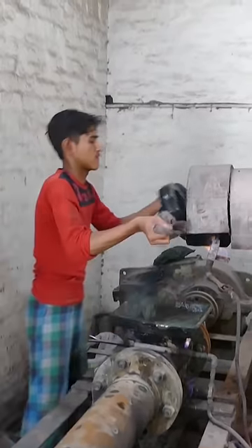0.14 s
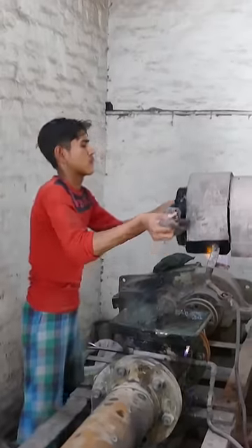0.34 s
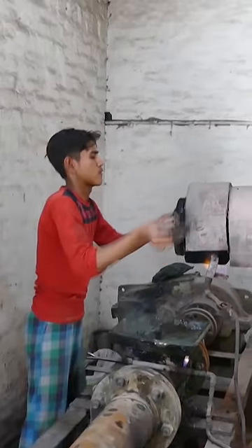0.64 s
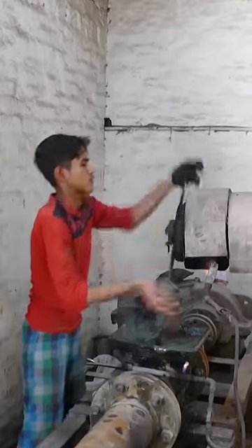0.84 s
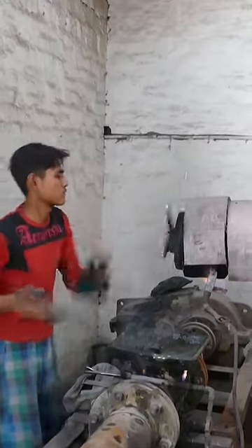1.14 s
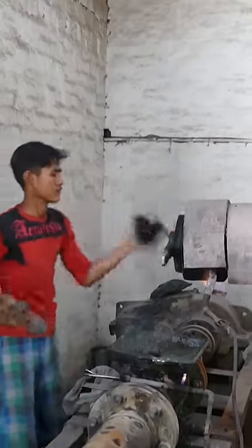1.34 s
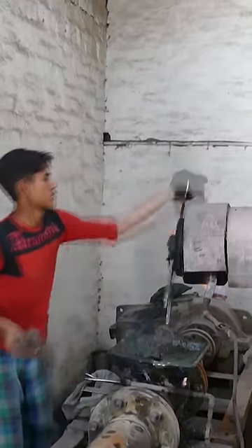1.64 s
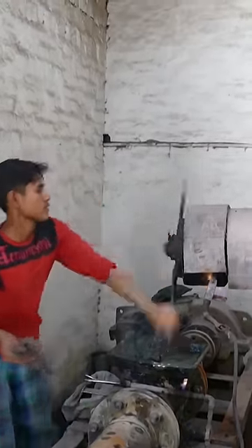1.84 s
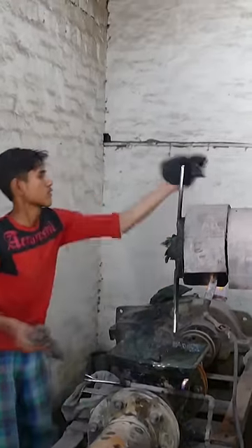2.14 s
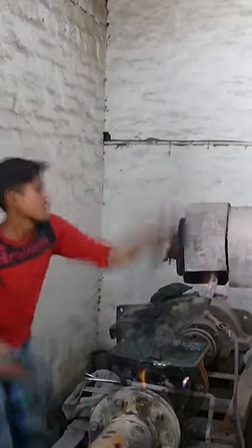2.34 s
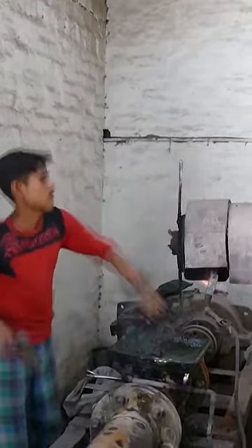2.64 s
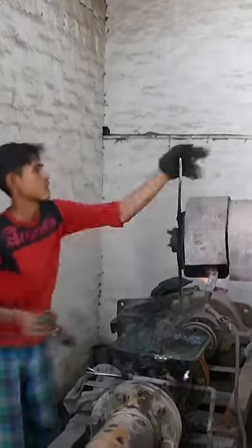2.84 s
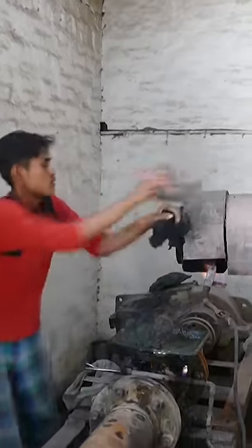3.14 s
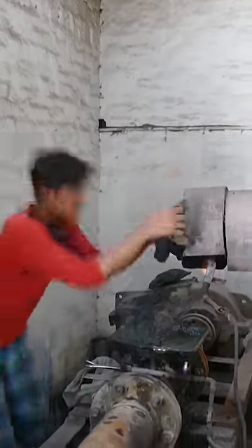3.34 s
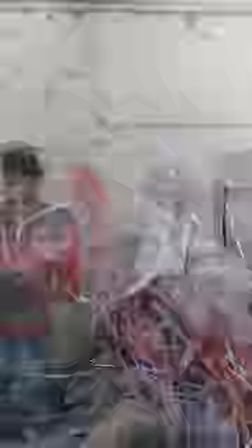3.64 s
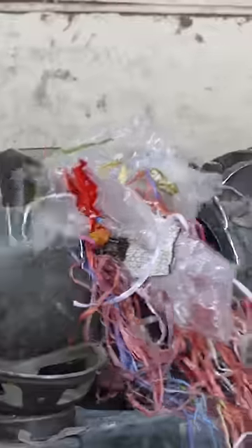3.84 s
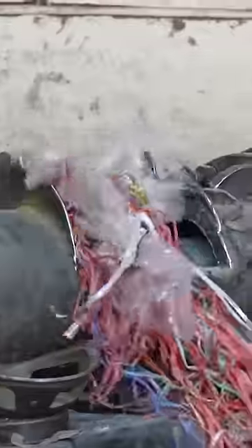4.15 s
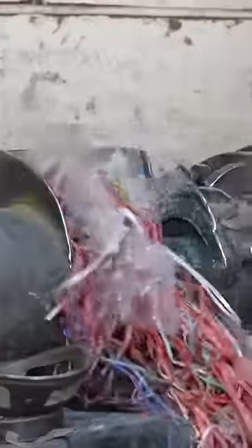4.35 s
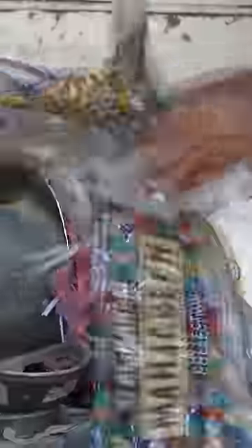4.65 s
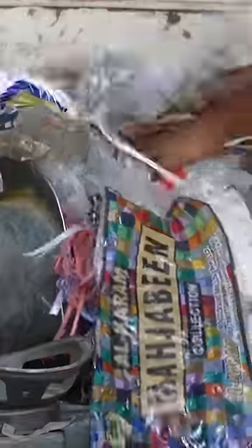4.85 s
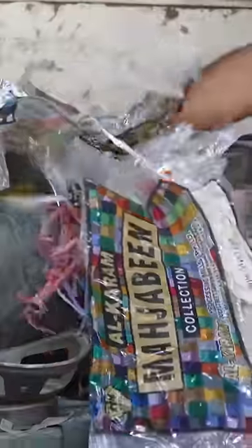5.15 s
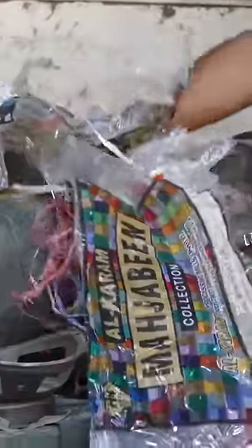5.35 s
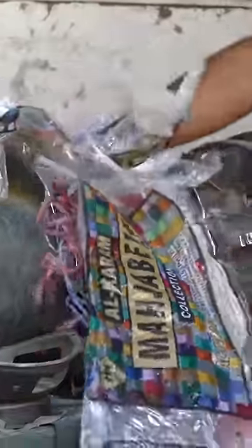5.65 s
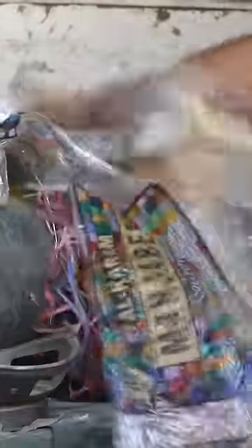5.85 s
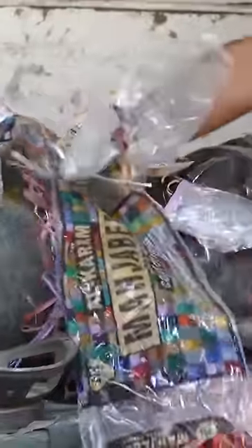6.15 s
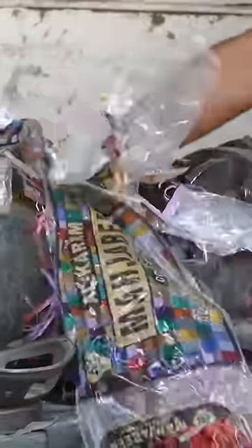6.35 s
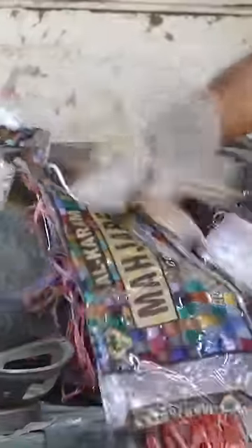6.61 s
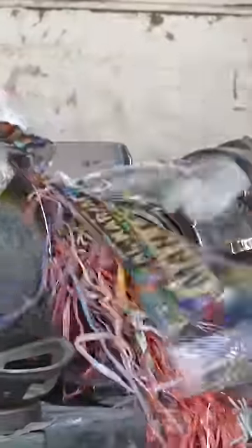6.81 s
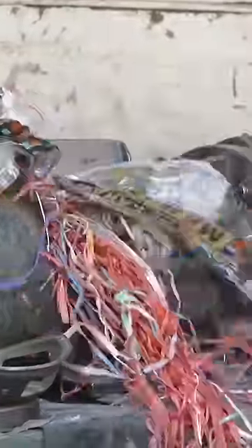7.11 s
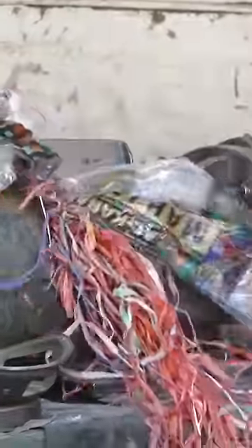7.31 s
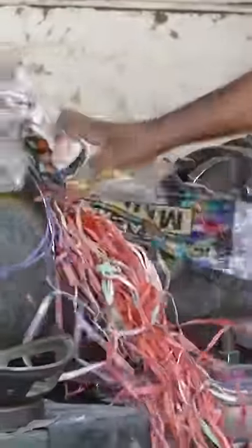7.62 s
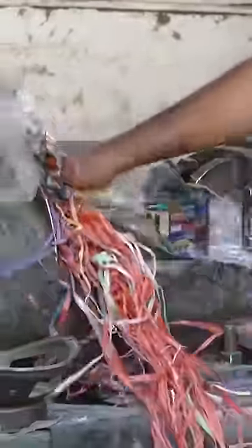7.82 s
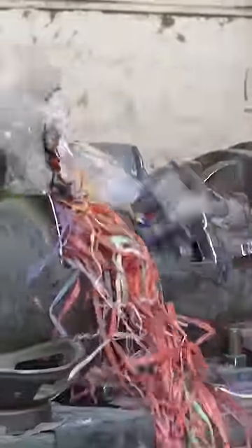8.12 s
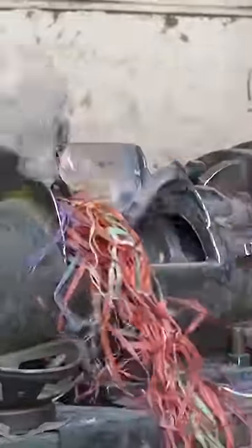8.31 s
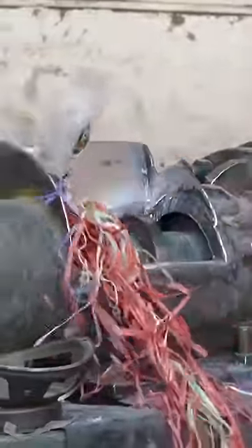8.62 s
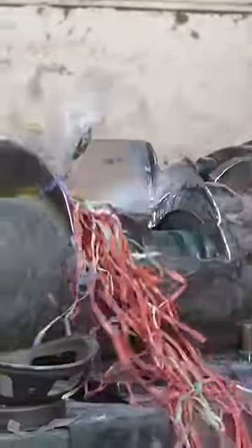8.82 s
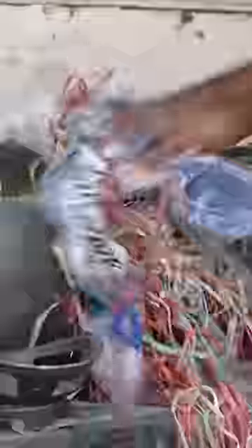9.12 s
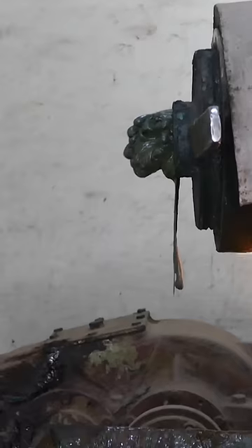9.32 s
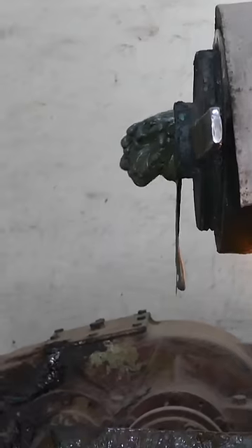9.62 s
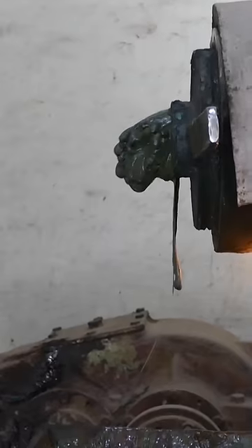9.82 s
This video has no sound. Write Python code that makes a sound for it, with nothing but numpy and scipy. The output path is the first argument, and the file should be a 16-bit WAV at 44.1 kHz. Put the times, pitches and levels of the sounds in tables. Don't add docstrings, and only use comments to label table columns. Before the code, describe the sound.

A loud machine runs without pause: stacked gear tones, wide midrange rush, airy gas hiss and tiny very high belt chirps. Two wet slaps open it, several thin steel clinks follow, then an abrupt jump brings a rougher throbbing gear hum and muffled thumps. A second jump changes the colour again, with faint slaps and panel rattles. Phone close by in a hard-walled room.

```python
import sys
import numpy as np
from scipy import signal
from scipy.fft import rfft, irfft, next_fast_len
from scipy.io import wavfile
from scipy.ndimage import uniform_filter1d, map_coordinates

SR = 44100
rng = np.random.default_rng(int(sys.argv[2]) if len(sys.argv) > 2 else 0)


def inscribe(sig):
    pcm = np.round(np.clip(np.atleast_2d(sig).T, -1, 1) * 32767)
    wavfile.write(sys.argv[1], SR, pcm.astype(np.int16))


def nominal_scale(level):
    x = np.asarray(level, float) / 20
    return 10 ** x


N = 439677


def unit(x):
    return x / np.sqrt(np.mean(x ** 2) + 1e-20)


def along(points, hz):
    f, v = np.transpose(points)
    return np.interp(np.log(hz + 1), np.log(f + 1), v)


def curves(rows, t):
    s, *columns = np.transpose(rows)
    return [np.interp(t, s, column) for column in columns]


def wobble(t, rate):
    slow = t[::32]
    knots = (slow - t[0]) * np.clip(rate, .1, 60)
    return np.interp(t, slow, map_coordinates(rng.standard_normal(400), [knots]))


def filtered(x, response):
    m = next_fast_len(x.shape[-1] + 8192)
    return irfft(rfft(x, m) * response(np.fft.rfftfreq(m, 1 / SR)), m)[..., :x.shape[-1]]


def resonance(hz, centre, width):
    return 1 / (1 + (2 * (hz - centre) / width) ** 2)


def add_at(out, s, sound):
    out[round(s * SR):][:len(sound)] += sound


MESH_HZ = [112.01, 111.872, 111.92]
# (multiple of the base, rms level/dB at place 1, 2, 3)
ORDERS_DB = [(1, -69, -93, -91), (2, -59, -62, -65), (3, -47.5, -51, -61), (5, -47, -50, -43),
             (6, -46, -48, -58), (7, -50, -48, -46), (9, -47, -52, -50), (10, -56, -46, -50),
             (11, -50, -59, -52), (13, -49, -54, -45), (14, -60, -53, -56), (15, -58, -51, -55),
             (19, -60, -55, -57), (26, -53, -60, -60), (27, -56, -54, -57), (28, -51, -56, -57),
             (30, -53, -57, -59), (36, -58, -60, -60), (16, -45, -48, -37), (17, -55, -48, -49),
             (22, -56, -52, -44), (23, -47, -69, -52), (24, -45, -50, -53), (32, -56, -54, -53)]
# (multiple of the base, rms level/dB at place 1, 2, 3)
SIDES_DB = [(4.077, -53, -65, -64), (4.897, -50, -50, -49), (7.135, -51, -53, -58), (12.747, -49, -55, -59),
            (13.08, -44, -60, -58), (20.578, -42, -54, -44), (20.641, -50, -63, -50),
            (21.579, -53, -66, -63), (29.371, -51, -51, -62), (31.369, -50, -56, -67),
            (33.262, -48, -71, -57), (43.14, -76, -57, -57), (30.37, -51, -55, -60), (35.26, -60, -59, -62),
            (40.14, -56, -66, -66), (41.14, -66, -62, -62), (42.14, -66, -59, -61)]
# (t/s, rms level/dB of order 4, of order 8)
SWAY = [(0.004, -31.5, -19.5), (0.19, -31.0, -19.0), (0.38, -32.5, -20.5), (0.56, -30.0, -20.5),
        (0.75, -31.0, -19.5), (0.94, -31.5, -19.0), (1.12, -32.0, -20.0), (1.31, -30.5, -19.5),
        (1.49, -30.5, -19.5), (1.68, -30.5, -20.5), (1.87, -28.0, -21.0), (2.05, -28.0, -21.0),
        (2.24, -28.5, -21.0), (2.43, -29.5, -20.0), (2.61, -30.0, -21.0), (2.8, -30.0, -20.0),
        (2.98, -31.0, -20.5), (3.17, -31.0, -20.5), (3.36, -31.5, -21.0), (3.54, -31.0, -21.5),
        (3.729, -28.5, -20.5), (3.737, -35.0, -25.5), (3.96, -33.0, -26.0), (4.15, -35.0, -26.5),
        (4.34, -34.5, -25.5), (4.53, -32.0, -26.0), (4.72, -32.5, -25.5), (4.91, -32.0, -24.5),
        (5.1, -32.0, -24.5), (5.29, -32.0, -25.5), (5.48, -33.5, -26.0), (5.67, -31.5, -26.0),
        (5.86, -32.0, -26.5), (6.05, -32.5, -25.5), (6.24, -31.5, -26.0), (6.43, -31.0, -26.0),
        (6.62, -29.5, -25.0), (6.81, -31.0, -27.0), (7.0, -30.0, -27.0), (7.19, -31.5, -28.5),
        (7.38, -30.0, -25.5), (7.57, -31.5, -26.5), (7.76, -33.0, -27.0), (7.96, -31.0, -25.0),
        (8.15, -30.5, -28.0), (8.34, -30.0, -25.0), (8.53, -30.5, -28.5), (8.72, -29.5, -27.0),
        (8.91, -30.0, -27.5), (9.1, -30.5, -27.5), (9.288, -29.5, -26.5), (9.296, -36.0, -30.0),
        (9.46, -36.0, -29.5), (9.63, -36.0, -30.0), (9.8, -35.0, -30.5), (9.966, -36.0, -32.0)]
# (t/s, rms level/dB of order 12, of order 20, of side line 34.262)
UPPER_SWAY = [(0.004, -29.5, -46.0, -41.0), (0.24, -32.0, -44.5, -41.5), (0.47, -31.5, -47.5, -40.5),
              (0.7, -30.5, -42.5, -41.0), (0.94, -30.5, -47.5, -40.5), (1.17, -29.0, -42.0, -42.5),
              (1.4, -30.0, -39.0, -41.5), (1.63, -29.5, -41.5, -45.5), (1.87, -31.0, -41.0, -39.0),
              (2.1, -31.0, -41.5, -46.0), (2.33, -31.0, -43.5, -39.5), (2.56, -31.5, -52.0, -45.5),
              (2.8, -32.0, -43.0, -40.0), (3.03, -32.5, -43.0, -42.0), (3.26, -31.0, -50.5, -42.0),
              (3.5, -32.0, -48.0, -42.0), (3.729, -31.0, -42.5, -42.5), (3.737, -25.5, -37.5, -42.0),
              (4.01, -27.0, -44.5, -41.5), (4.25, -29.0, -39.5, -42.0), (4.49, -31.5, -44.0, -41.5),
              (4.73, -31.0, -43.0, -40.0), (4.97, -30.5, -37.5, -48.5), (5.21, -29.5, -37.0, -42.5),
              (5.45, -30.5, -39.5, -43.0), (5.69, -30.5, -46.5, -42.5), (5.93, -32.5, -39.0, -43.5),
              (6.17, -29.5, -37.5, -44.0), (6.41, -29.5, -40.5, -47.0), (6.65, -31.0, -44.0, -43.0),
              (6.89, -29.0, -41.0, -47.0), (7.13, -28.5, -39.0, -47.0), (7.37, -30.0, -38.5, -46.0),
              (7.61, -31.5, -36.5, -46.0), (7.85, -30.5, -42.0, -46.5), (8.09, -32.0, -47.0, -46.5),
              (8.33, -30.0, -46.5, -46.0), (8.57, -31.5, -47.0, -42.5), (8.81, -29.0, -39.0, -47.5),
              (9.05, -29.0, -43.0, -47.0), (9.288, -28.5, -39.5, -42.0), (9.296, -24.5, -36.5, -50.5),
              (9.52, -26.0, -37.0, -50.0), (9.74, -27.5, -36.0, -52.0), (9.966, -28.0, -42.5, -51.5)]
FLUTTER_DB = {4: .3, 8: 0.67, 12: 1, 20: 2, 34.262: 1.8}
# (t/s, f/Hz)
SLIP = [(0, 5.7), (.6, 5.6), (.85, 4.8), (1.3, 5.15), (2, 5.3), (2.5, 5.8), (3.73, 5.55)]
TWIN_DB = [-36, -52, -59]


def whine(t, place):
    in_step_s = .052
    shaft_unrest = .01 * wobble(t, 3) + .0015 * wobble(t, 30)
    turns = MESH_HZ[place] * (t - in_step_s) + shaft_unrest
    start, slow = rng.random(60), t[::32]
    ahead = np.cumsum(curves(SLIP, t)[0]) / SR - SLIP[0][1] * in_step_s

    swaying_db = curves(SWAY, slow) + curves(UPPER_SWAY, slow)
    lines = []
    for (k, flutter_db), db in zip(FLUTTER_DB.items(), swaying_db):
        lines.append((k, 0, db + flutter_db * wobble(slow, 12), 0))
    for k, *db in ORDERS_DB + SIDES_DB:
        lines.append((k, 0, db[place] + .5, min(.4 + .09 * k, 2.2)))
    lines.append((12, ahead, TWIN_DB[place], .6))

    out = np.zeros(len(t))
    for k, lead, db, flicker_db in lines:
        level = np.interp(t, slow, nominal_scale(db + flicker_db * wobble(slow, 5.15)))
        out += level * np.sqrt(2) * np.sin(2 * np.pi * (k * turns + lead + start[round(k)]))
    return out


# (turns/s, peak t/s, level/dB)
WHEEL = (2.288, 3.98, .55)
WHEEL_S = [0, 6.3, 9.58]
PINION_S = [0, 6.66, 9.415]
# (centre f/Hz, Hz per Hz of mesh drift, pulse level/dB once a pinion turn,
# twice a turn, blur f/Hz)
WORN = [
    (480.4, 1, 1, .6, 1.6),
    (963, 1.9, 2, 3.5, 1.2),
    (1445, 2, 3, 2, 9),
    (1913, 2, 10, 1.5, 30),
]
WORN_DB = [
    [0.1, -30.5, -35.5, -37.5],
    [0.1, -29.5, -44, -42],
]
# (t/s, mesh f/Hz, first line level/dB, share that swells with the wheel, runout share)
WORN_MESH = [(3.74, 476, -28, 0.34, 0.92), (4.0, 476, -31.5, 0.4, 1), (4.9, 475.7, -32, 0.44, 0.71),
             (5.35, 478.4, -31, .6, 1.5), (6.3, 476.5, -30.5, 0.65, 1), (7, 482, -31.5, 0.71, 0.89),
             (8.0, 480, -30.5, 0.7, 0.29), (9.28, 481, -32.5, 0.77, 0.55), (9.3, 480.6, -31.5, 0.75, .8),
             (9.97, 479, -37, 0.47, 1)]
# (t/s, second line level/dB, top line level/dB)
TURNS = [(3.79, 0.3, 0.8), (3.96, -1.1, 2.9), (4.13, -3.6, 1.8), (4.3, 1.8, 0.6), (4.47, 2.2, 3.3),
         (4.64, -0.0, 1.9), (4.81, 2.7, 4.4), (4.97, -2.2, -0.5), (5.14, -1.4, 1.2), (5.31, 1.6, 2.0),
         (5.48, -2.4, 0.3), (5.65, 1.7, -4.6), (5.82, -1.2, -0.1), (5.99, -1.3, 0.8), (6.15, 3.3, 3.5),
         (6.32, -0.9, 0.1), (6.49, -0.2, -1.7), (6.66, 1.0, -3.0), (6.83, -1.9, -1.3), (7.0, 1.6, -1.4),
         (7.17, -1.0, -3.8), (7.33, -0.2, -3.3), (7.5, 3.0, -0.9), (7.67, -0.8, 2.2), (7.84, 1.2, 2.0),
         (8.01, -0.2, 2.3), (8.18, 0.6, -0.5), (8.35, 1.7, -5.8), (8.51, -1.9, -3.4), (8.68, 0.7, 0.8),
         (8.85, -2.4, 2.0), (9.02, 0.1, -0.1), (9.19, -0.8, -2.1), (9.45, 4, 2.8), (9.6, -3.1, -1.8),
         (9.79, 2, 1.0), (9.95, 2, -2.0)]
PULSE_LAG = [0, 1.6, 0, 0]


def worn_gears(t, place):
    mesh_hz, first_db, share, runout = curves(WORN_MESH, t)
    second_db, top_db = curves(TURNS, t)
    wheel_angle = 2 * np.pi * WHEEL[0] * (t - WHEEL_S[place])
    pinion = 2 * np.pi * 5.93 * (t - PINION_S[place])

    first = nominal_scale(first_db) * (1 + share * np.cos(wheel_angle))
    second = (1 + .8 * share * np.cos(wheel_angle - .45)) * nominal_scale(.98 * second_db)
    swells = [first, second, 1, nominal_scale(1.4 * top_db)]

    drift = mesh_hz - WORN[0][0] + 1.2 * np.cos(wheel_angle - .5)
    bad_tooth = pinion - 1.35
    kick = runout * (np.cos(bad_tooth) + .6 * np.cos(2 * bad_tooth))
    kicks_hz = [2.2, 6, 9, 5]

    out = np.zeros(len(t))
    for row, level_db, swell, kick_hz, lag in zip(WORN, WORN_DB[place - 1], swells, kicks_hz, PULSE_LAG):
        hz, follow, once_db, twice_db, blur_hz = row
        pulse = nominal_scale(once_db * np.cos(pinion - lag) + twice_db * np.cos(2 * pinion + 2.3))
        line_hz = hz + follow * drift + kick_hz * kick + blur_hz * wobble(t, hz / 40 + 10)
        phase = 2 * np.pi * np.cumsum(line_hz) / SR
        unrest = nominal_scale((.3 + hz / 4000) * wobble(t, 7) + 3 * (hz / 1910) ** 3 * wobble(t, 45))
        out += nominal_scale(level_db) * swell * unit(pulse * unrest * np.sin(phase))
    return out


# (f/Hz, side under mid level/dB)
WIDTH = [
    [(60, -10), (100, -1), (180, -3), (310, -15), (550, -25), (1100, -24), (1650, -12.5), (2860, -18.5), (4970, -6), (6600, -11), (8640, -15), (15000, -8)],
    [(60, -8), (100, -5), (180, -3), (310, -12), (550, -43), (1100, -30), (1650, -17), (2860, -18), (4970, -11), (8640, -15.5), (15000, -18)],
    [(60, -10), (100, -14), (180, -6), (310, -14), (550, -33), (950, -27), (1650, -13), (2860, -19), (4970, -12), (8640, -13), (15000, -22)],
]


def rush(t, gain, place, patchy_db):
    z = signal.stft(rng.standard_normal((2, len(t) + 512)), nperseg=512)[2]
    field = uniform_filter1d(rng.standard_normal(z.shape[1:]), size=8, axis=0)
    field = uniform_filter1d(field, size=10, axis=1)
    pair = signal.istft(z * nominal_scale(patchy_db * unit(field)), nperseg=512)[1][:, :len(t)]
    mid, side = filtered(pair, lambda hz: gain(hz) * nominal_scale([0 * hz, along(WIDTH[place], hz)]))
    return np.array([mid + side, mid - side]) / np.std(mid)


# (f/Hz, level/dB per Hz)
ROAR = [
    [(40, -36), (150, -33), (300, -9.5), (400, -10.5), (550, -4), (900, -4), (1400, -1.5), (1800, -3),
     (2500, -2.5), (3500, -1), (4500, -6.5), (5700, -24), (8000, -25)],
    [(40, -44), (150, -46), (250, -17), (400, -4.5), (550, 3.5), (800, 2.5), (1000, 1), (1200, 6.5),
     (2000, -0.5), (3200, -1.5), (4200, -9.5), (5500, -15), (8000, -25)],
    [(40, -38), (150, -39), (250, -22), (400, -4.5), (550, 1), (800, 0.5), (1000, 11.5), (1200, -0.5),
     (2000, 0.5), (3200, -1), (4200, -8.5), (5500, -12), (8000, -27)],
]
# (f/Hz, width f/Hz, lift level/dB)
CASING = [
    [(545, 24, -1), (840, 23, 2.5), (1460, 57, 1), (1590, 82, -4.5), (2120, 430, -4.5), (2250, 32, 5.5),
     (3750, 47, 5.5)],
    [(380, 7.2, 0), (584, 19, 9), (672, 12, 8.5), (773, 23, 7.5), (865, 28, 8.5), (980, 60, 9.5),
     (1214, 125, -7), (1850, 95, -0.5), (1897, 50, 6), (2030, 180, -2.5), (3270, 18, 7.5), (2560, 67, -1)],
    [(376, 12, 11), (584, 31, 8), (650, 22, 7), (773, 20, 6), (910, 24, 4), (1020, 27, 0), (1470, 40, 7),
     (1950, 27, 3), (2050, 150, -2.5), (3300, 60, 3)],
]


def drive_roar(t, place):
    def gain(hz):
        lift_db = sum(db * resonance(hz, centre, width) for centre, width, db in CASING[place])
        return nominal_scale(along(ROAR[place], hz) + lift_db)
    return nominal_scale([-26.5, -23, -22.5][place]) * rush(t, gain, place, patchy_db=.9)


# (f/Hz, level/dB per Hz)
HISS = [
    [(3000, -22), (5800, -11), (7300, -4), (8300, 2.5), (9100, 2), (10000, 5), (11200, -1), (12200, -6.5),
     (15800, -9.5)],
    [(3000, -24), (5400, -7), (7000, -1.5), (9000, -5), (11000, -11), (13000, -15.5), (15800, -18.5)],
    [(3000, -27), (5400, -3), (7000, 1), (9000, -0.5), (11000, -4), (13000, -9), (15800, -14)],
]


def burner_hiss(t, place):
    noise = rush(t, lambda hz: nominal_scale(along(HISS[place], hz)), place, patchy_db=.34)
    return nominal_scale([-37, -35.5, -35.5][place]) * noise


CUTS = [0, 3.733, 9.292]
# (t/s, level/dB)
LEVELS = [(0.0, 0.3), (0.38, -0.5), (0.8, 0.6), (1.13, -0.1), (1.76, 0.8), (2.87, 0.5), (3.11, -0.5),
          (3.72, 0.4), (3.75, 0.7), (4.41, -0.1), (5.52, -1), (5.84, -0.86), (9.13, -1.1), (9.3, -1),
          (9.434, 0.5), (9.696, -1.5), (9.97, 0)]
# (f/Hz, left over right level/dB)
LEAN = [(900, 0), (1500, .2), (2400, 1.1), (4400, 1.6), (8000, .6), (15000, .5)]
TILT_DB = [.4, 0, 0]


def machine(place):
    first = round(CUTS[place] * SR)
    last = ([round(s * SR) for s in CUTS[1:]] + [N])[place] + 128
    t = np.arange(first, last) / SR
    halves = np.array([[.5], [-.5]])
    effort_db, = curves(LEVELS, t)
    noise = drive_roar(t, place) + burner_hiss(t, place)

    throb_db = .33 * wobble(t, 14) + .4 * wobble(t, 35)
    if place == 1:
        turns, peak_s, wheel_db = WHEEL
        throb_db = throb_db + wheel_db * np.cos(2 * np.pi * turns * (t - peak_s))

    tones = whine(t, place)
    if place:
        tones = tones + worn_gears(t, place)
    tones = tones * nominal_scale((TILT_DB[place] + .2 * wobble(t, 1.9)) * halves)
    both = tones + nominal_scale(effort_db + throb_db) * noise

    lag_s = 5e-6
    return filtered(both, lambda hz: nominal_scale(along(LEAN, hz) * halves) * np.exp(-2j * np.pi * hz * lag_s * halves))


# (joint number, peak level/dB)
CHIRPS = [(0, -38), (1, -39), (3, -38), (4, -38), (6, -41), (7, -39), (10, -35), (11, -36), (14, -39),
          (17, -41), (19, -46), (20, -36), (23, -39), (24, -42), (26, -36), (27, -38), (29, -35), (30, -38),
          (32, -38), (33, -35), (35, -36), (36, -35)]


def belt():
    out, t = np.zeros(N), np.arange(SR // 10) / SR
    for joint, db in CHIRPS:
        s = .0215 + joint * .1003
        hz = 15650 + 300 * np.exp(-t / .015) + 30 * wobble(t, 60)
        swell = (t / .016) ** 2 * np.exp(2 - 2 * t / .015) * nominal_scale(3 * wobble(t, 59))
        add_at(out, s - .014, nominal_scale(db) * swell * np.sin(2 * np.pi * np.cumsum(hz) / SR))
    return out * nominal_scale([[1.2], [-1.2]])


# (t/s, level/dB)
CLINKS = [
    (2.21, -41),
    (2.602, -24),
    (2.846, -35),
    (3.001, -23),
    (3.363, -26),
    (3.62, -35),
]
# (f/Hz, level/dB, swells until t/s, then dies in t/s)
BLADE = [(7950, 0, .002, .003), (8670, 2, .009, .005), (9400, -7, .012, .005), (10200, -7, .024, .005),
         (13100, -5, .016, .006), (14000, -10, .005, .004), (14800, -3, .005, .008)]


def blade():
    out, t = np.zeros(N), np.arange(SR // 5) / SR
    for s, db in CLINKS:
        for late_s, less_db in [(0, -8.5), (.011, -23), (.028, -17)]:
            ring = np.zeros(len(t))
            for hz, level_db, top_s, dies_s in BLADE:
                size = nominal_scale(level_db + rng.normal(0, 1.7))
                swell = (t / top_s * np.exp(1 - t / top_s)) ** (top_s / dies_s)
                ring += size * swell * np.sin(2 * np.pi * hz * (1 + rng.normal(0, .0038)) * t)
            add_at(out, s + late_s, nominal_scale(db + less_db) * ring)
        walls = filtered(rng.standard_normal(len(t)), lambda hz: sum(
            nominal_scale(level_db) * resonance(hz, centre, 1000) for centre, level_db, *_ in BLADE))
        decay = nominal_scale(db - 11 - 60 * t / .5) + nominal_scale(db - 15 - 60 * t / .068)
        add_at(out, s, decay * unit(walls))
    return out * nominal_scale([[.8], [-.8]])


# (t/s, level/dB, decay t/s)
KNOCKS = [
    (0.284, -19, 0.02),
    (.312, -19, 0.02),
    (.56, -23, 0.03),
    (8.821, -28, .05),
    (9.41, -32, 0.04),
]
# (f/Hz, width f/Hz, level/dB)
LUMP = [(670, 60, -8), (1150, 250, -2), (1800, 400, -2), (2200, 400, -4), (3100, 350, 1), (3600, 450, 1)]
# (t/s, level/dB, decay t/s)
THUMPS = [
    (3.765, -24, .03),
    (3.797, -21, .035),
    (4.13, -27, .04),
    (4.26, -27, .08),
    (8.645, -21, .03),
    (8.685, -20, .04),
    (9.72, -22, .05),
]
# (f/Hz, width f/Hz, level/dB)
HOPPER = [(580, 40, 0), (680, 40, 0), (780, 40, -3), (1660, 60, -4)]
# (t/s, rms level/dB, length t/s)
SNAP = (3.085, -19.5, .001)


def melt():
    out, t = np.zeros(N), np.arange(SR // 4) / SR
    for (s, db, decay_s), body in [(row, LUMP) for row in KNOCKS] + [(row, HOPPER) for row in THUMPS]:
        colour = [(c * (1 + rng.normal(0, .02)), w, level + rng.normal(0, 2)) for c, w, level in body]
        puff = unit(filtered(rng.standard_normal(len(t)), lambda hz: sum(
            nominal_scale(level) * resonance(hz, c, w) for c, w, level in colour)))
        add_at(out, s, nominal_scale(db - 20 * t / decay_s) * (1 - np.exp(-t / .00072)) * puff)
    s, db, length_s = SNAP
    fizz = unit(filtered(rng.standard_normal(len(t)), lambda hz: np.exp(-((hz - 9800) / 3000) ** 2)))
    add_at(out, s, nominal_scale(db) * (t < length_s) * fizz / np.std(fizz[t < length_s]))
    return out


# (t/s, peak level/dB, swell t/s,
# f/Hz)
RATTLES = [(.284, -22, .006, 3550), (.285, -25, .006, 2050), (.312, -26, 0.0071, 3150),
           (3.764, -26, 0.008, 890), (3.77, -29, .006, 1370), (3.77, -28, .008, 2280),
           (3.794, -28, 0.0053, 1890), (3.803, -25, .008, 605), (3.812, -27, 0.0064, 936),
           (3.765, -33, .02, 1650), (8.815, -29, .015, 2240), (8.85, -33, .008, 2950),
           (9.39, -24, 0.023, 1456), (9.39, -25, 0.034, 1047), (9.58, -31, .025, 1040),
           (9.73, -27, .025, 1465), (9.72, -27, 0.023, 770), (9.91, -27, .025, 1037),
           (.18, -50, .02, 14800), (2.77, -47, .01, 13100), (2.84, -42, .012, 13050),
           (2.21, -49, .012, 14000), (3.615, -46, .01, 14200)]


def panels():
    out, t = np.zeros(N + SR), np.arange(SR // 4) / SR
    for s, db, swell_s, hz in RATTLES:
        phase = 2 * np.pi * np.cumsum(hz * (1 + .008 * wobble(t, 40))) / SR
        swell = t / swell_s * np.exp(1 - t / swell_s)
        add_at(out, s, nominal_scale(db) * swell * np.sin(phase))
    return out[:N]


def scene():
    out = np.zeros((2, N + 128))
    fade = np.sin(np.linspace(0, np.pi / 2, 128))
    for place, s in enumerate(CUTS):
        part = machine(place)
        part[:, -128:] *= fade[::-1]
        if place:
            part[:, :128] *= fade
        if place == 1:
            t = np.arange(part.shape[1]) / SR
            part *= nominal_scale(-3.5 / (1 + (t / .028) ** 8))
        out[:, round(s * SR):][:, :part.shape[1]] += part
    tick = np.hanning(40)
    out[:, round(CUTS[2] * SR):][:, :40] += nominal_scale(-25) * tick
    out[:, N - 50:N - 10] -= nominal_scale(-19) * tick
    return out[:, :N] + belt() + blade() + melt() + panels()


def top_cut(x):
    return signal.sosfilt(signal.butter(12, 15880, fs=SR, output="sos"), x)


def record(dry):
    mix = filtered(dry, lambda hz: hz < 15775)
    return top_cut(mix)


dry = scene()
out = record(dry)
inscribe(out)
```